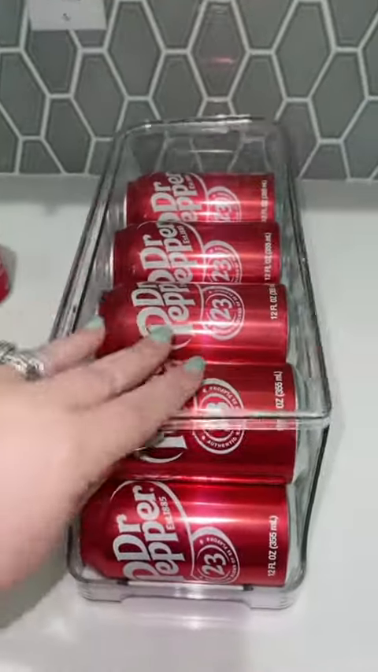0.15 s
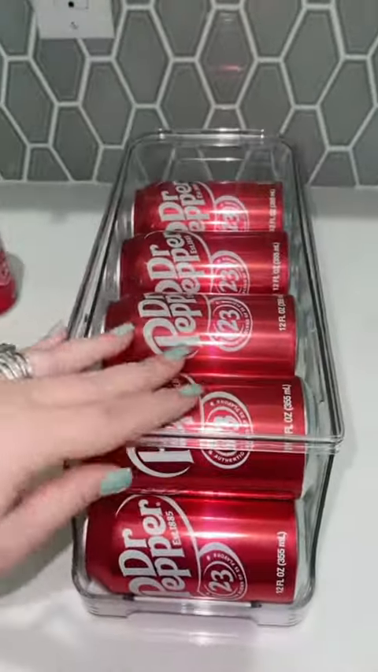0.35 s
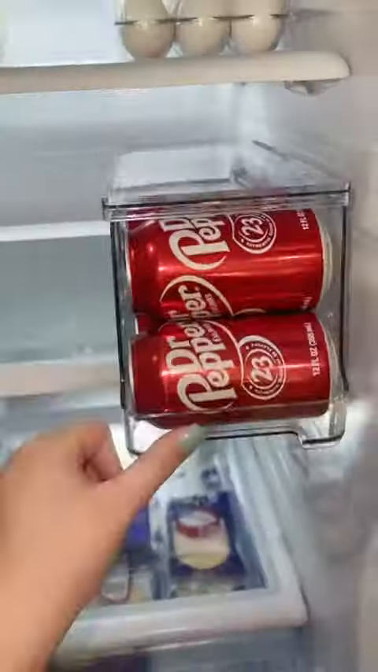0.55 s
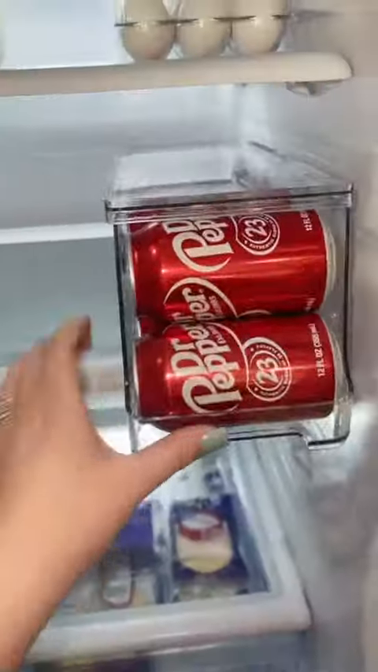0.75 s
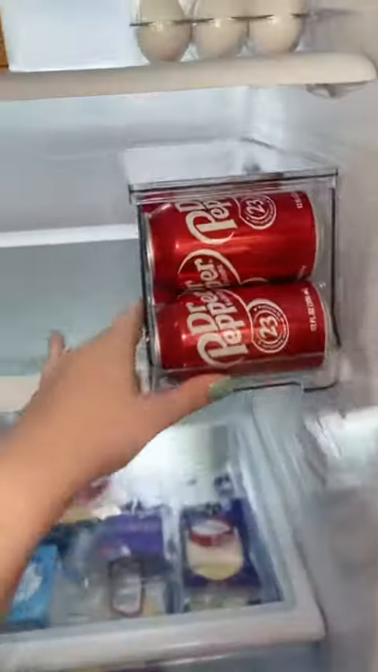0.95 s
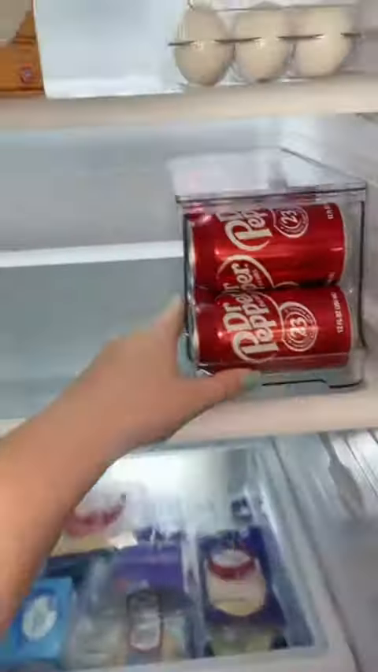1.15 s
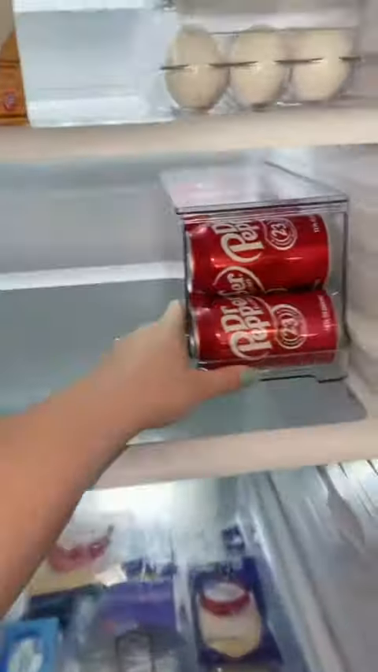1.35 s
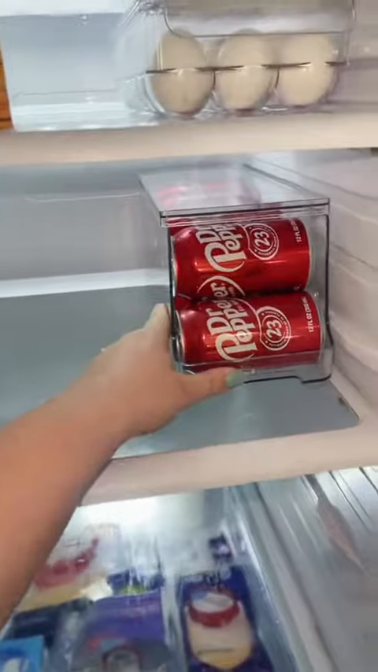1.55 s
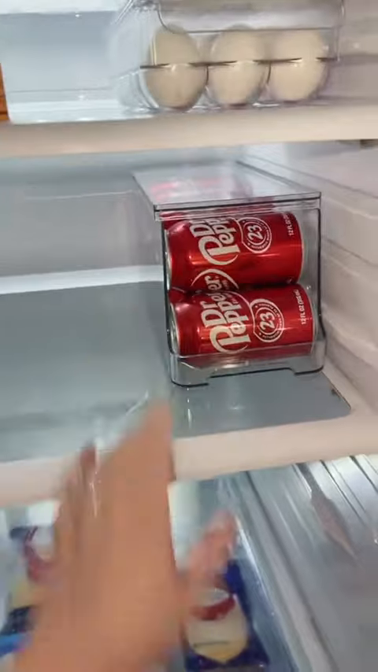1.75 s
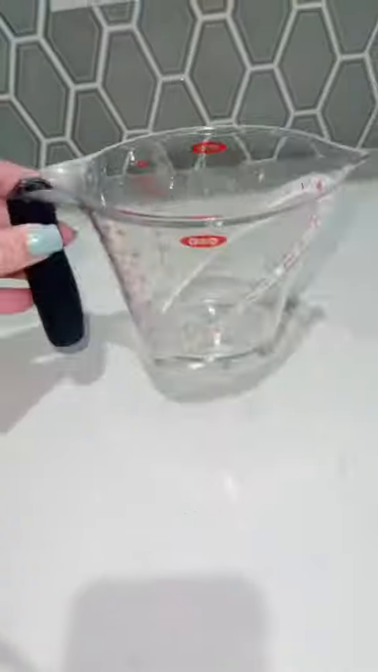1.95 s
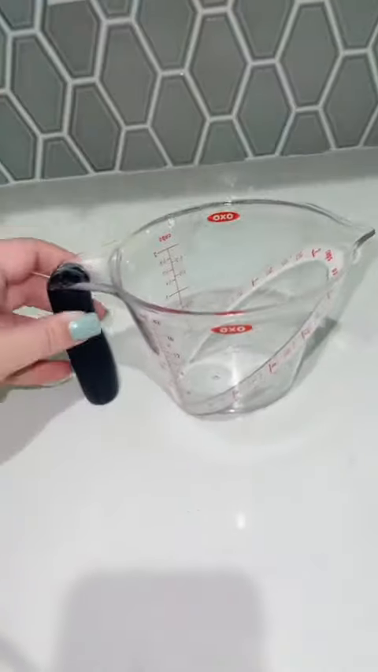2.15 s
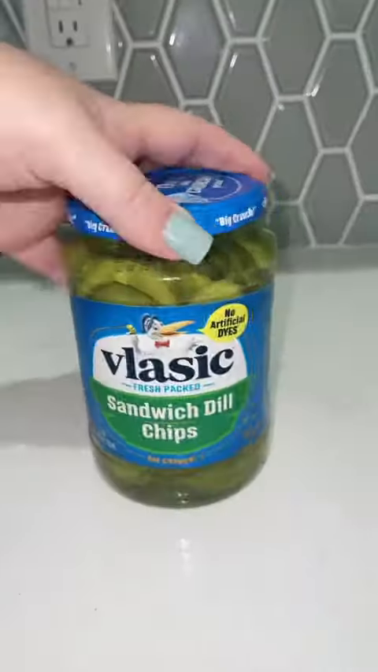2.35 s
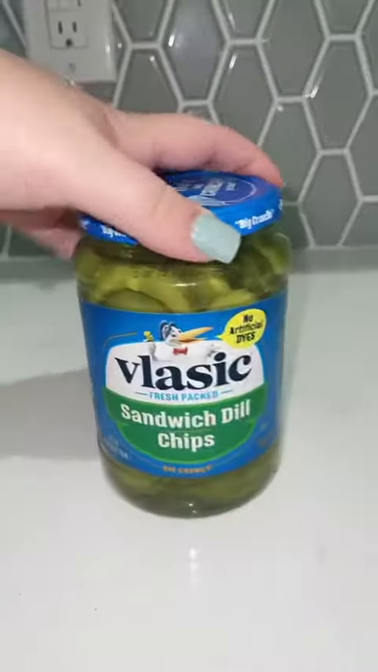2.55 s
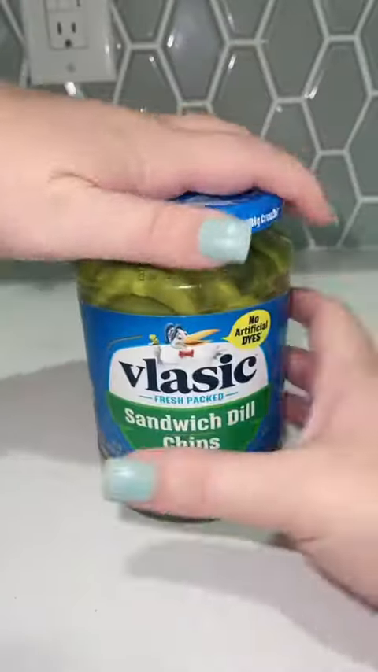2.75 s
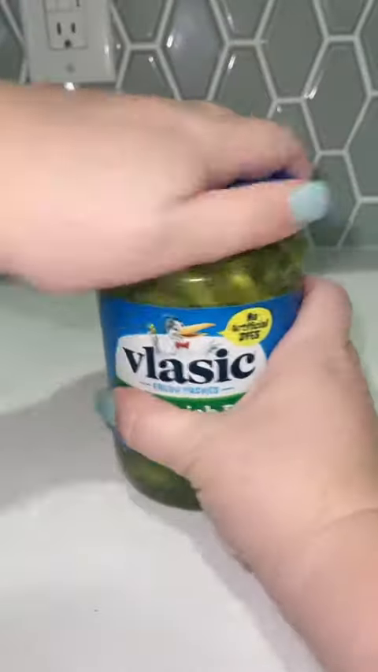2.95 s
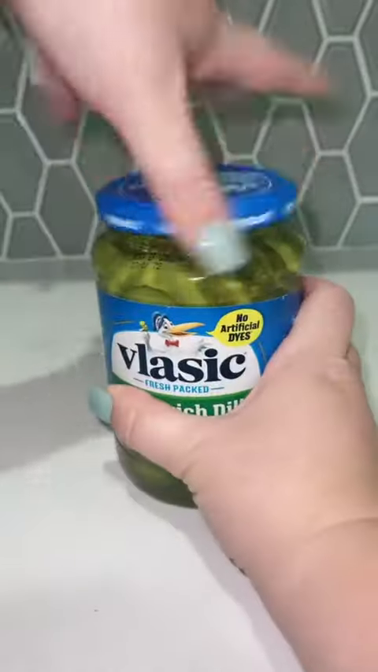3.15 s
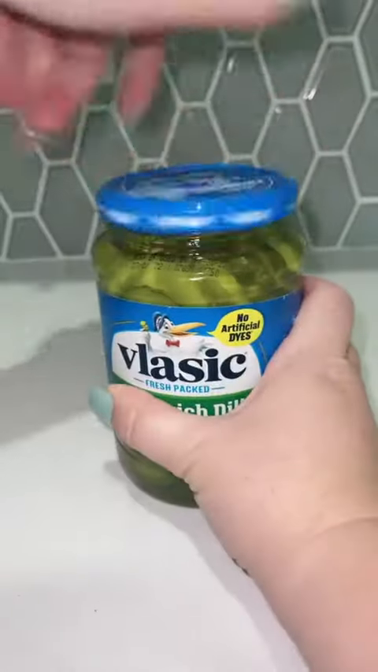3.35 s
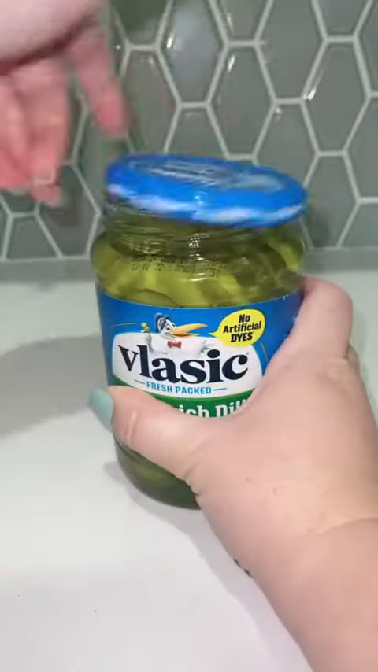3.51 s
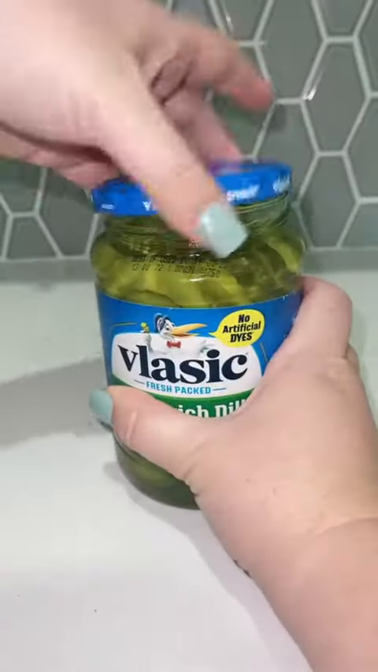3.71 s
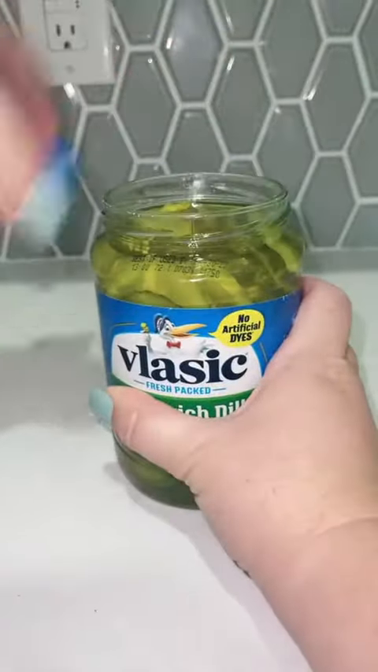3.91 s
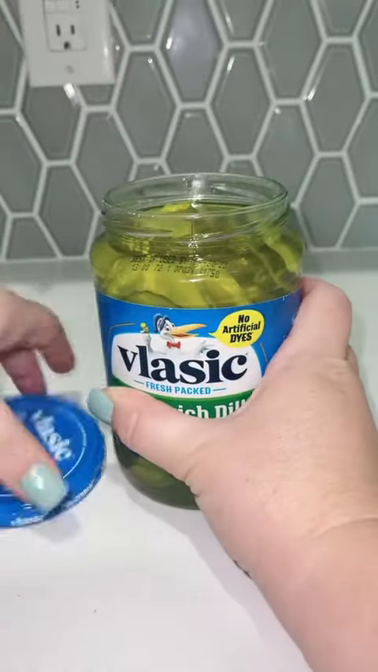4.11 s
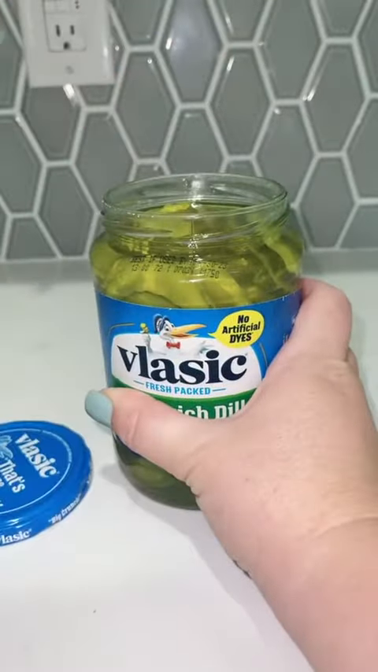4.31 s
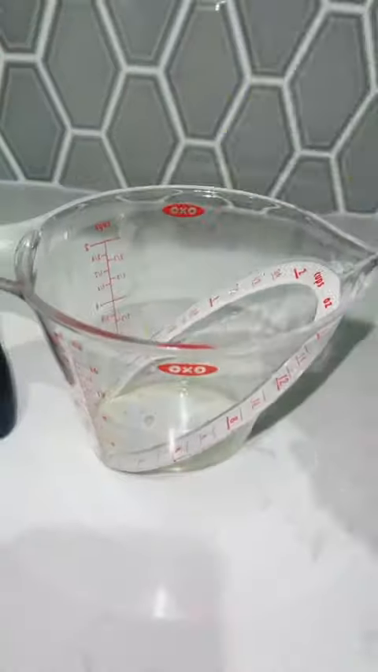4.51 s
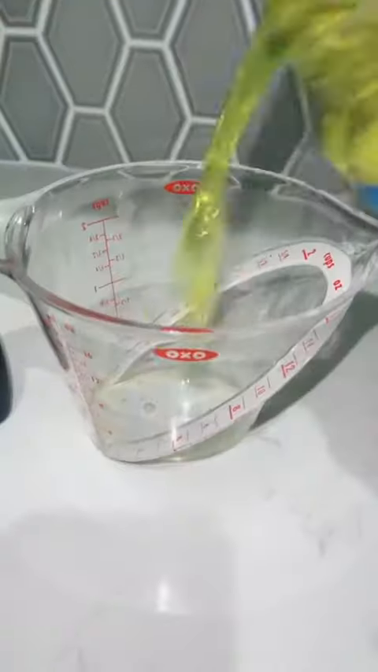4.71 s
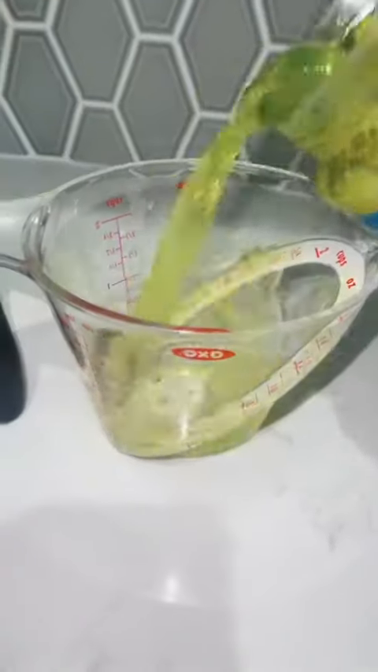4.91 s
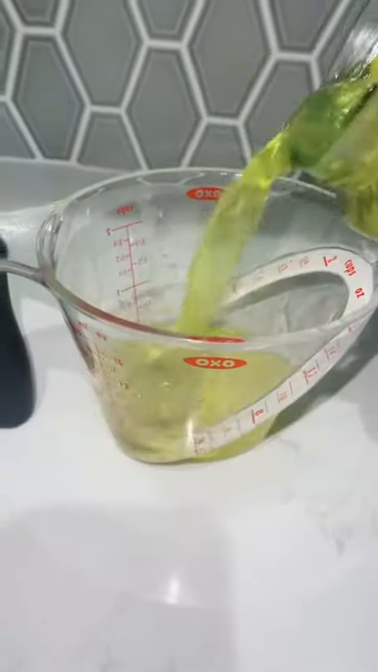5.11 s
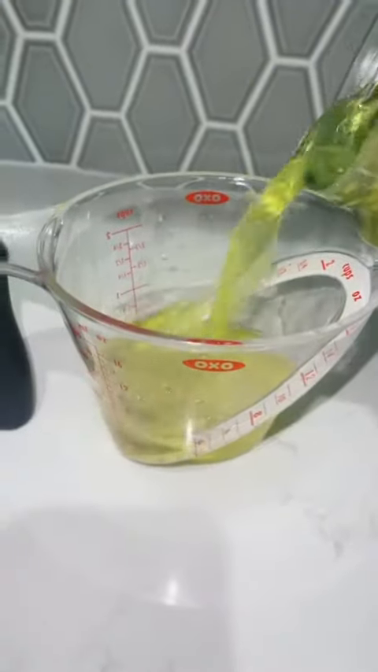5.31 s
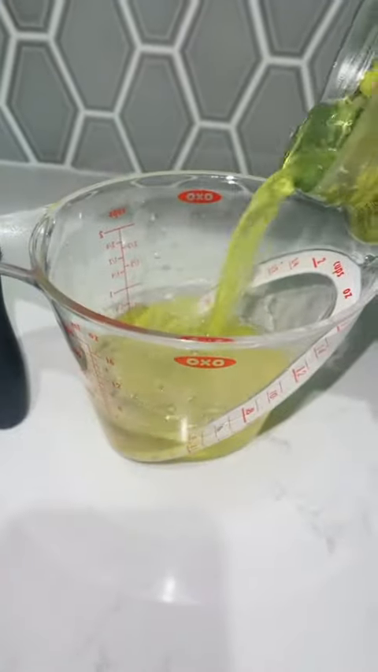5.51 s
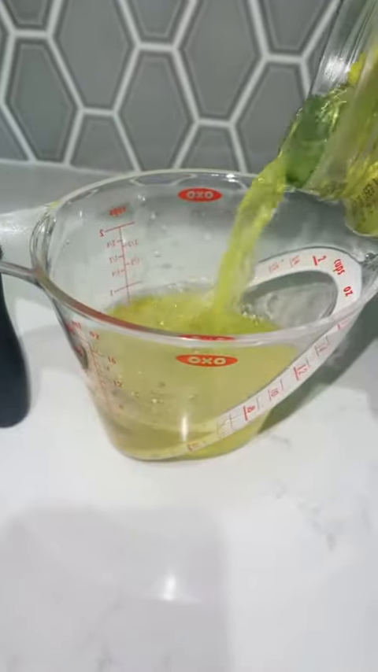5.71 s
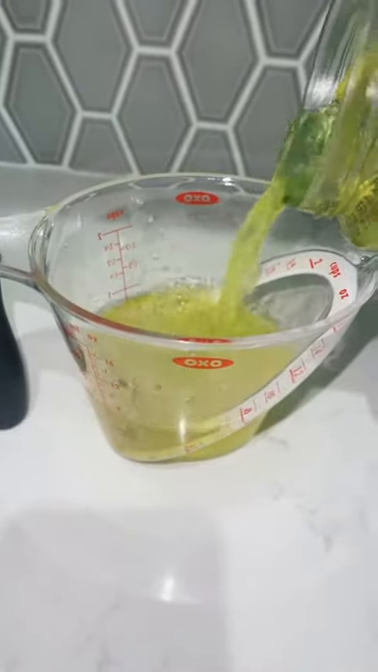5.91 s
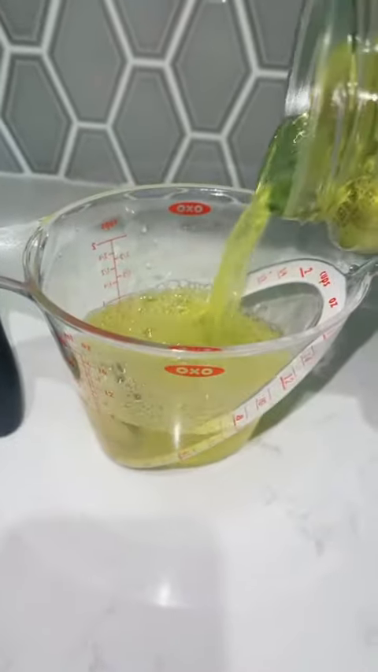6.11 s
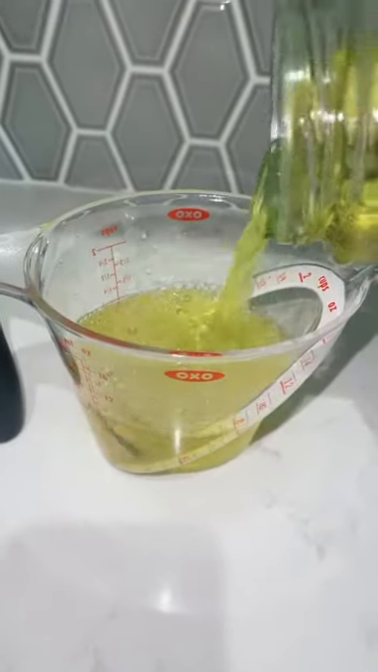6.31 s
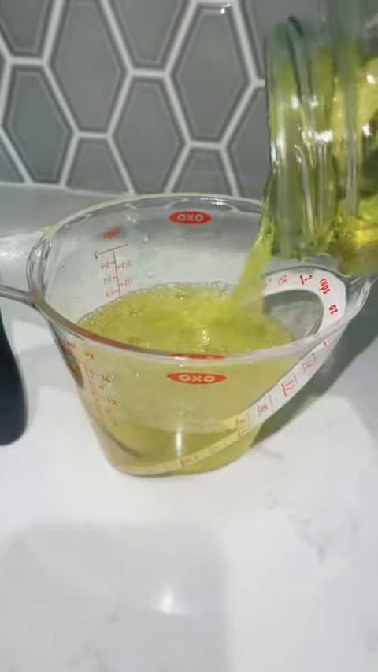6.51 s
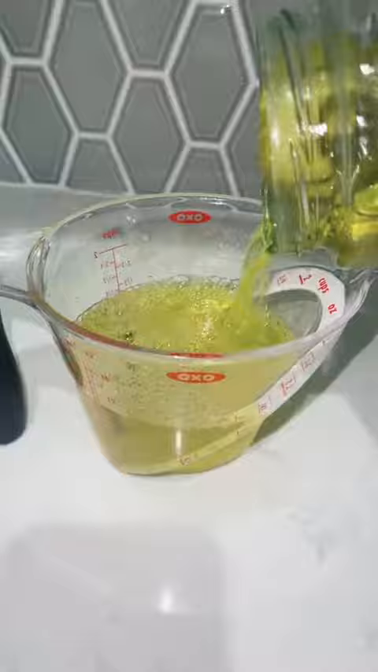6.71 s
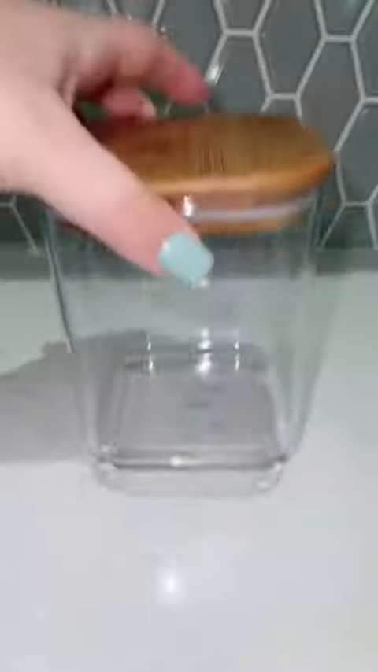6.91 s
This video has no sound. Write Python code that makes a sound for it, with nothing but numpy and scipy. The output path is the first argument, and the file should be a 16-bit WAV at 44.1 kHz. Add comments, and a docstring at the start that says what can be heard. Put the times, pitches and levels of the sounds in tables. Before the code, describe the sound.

Close kitchen handling sounds: hard plastic clacks, shelf thuds, a scraping jar lid rattling on the counter, splashing liquid filling a cup, one final knock.

```python
"""A kitchen with hard walls and a low hum, heard in six short moments with near-silent gaps between them.
A lid clacks onto a plastic bin of cans, the bin is pushed onto a fridge shelf, a plastic measuring cup is set
down, a steel lid is unscrewed from a pickle jar and dropped, brine is poured into the cup, a canister lands.
Solid things are bursts of noise played through the resonances of each object; the brine is made of many small
ringing bubbles and spatter, and the hum is filtered noise."""
import sys
import numpy as np
from scipy import signal
from scipy.fft import rfft, irfft
from scipy.io import wavfile
from scipy.ndimage import uniform_filter1d

SR = 44100
rng = np.random.default_rng(int(sys.argv[2]) if len(sys.argv) > 2 else 0)


def dump(signal):
    """Clip the signal to [-1, 1] and save it as 16-bit WAV at the path in sys.argv[1]."""
    limited = np.clip(np.atleast_2d(signal).T, -1, 1)
    pcm = np.round(limited * 32767).astype(np.int16)
    wavfile.write(sys.argv[1], SR, pcm)


N = 311346
T = np.arange(N) / SR  # time in seconds
SPAN = 32768  # samples in one response or contact
HZ = np.maximum(np.arange(SPAN // 2 + 1) * SR / SPAN, 1)  # frequencies of its spectrum

# when each of the six moments is heard: start_s, end_s [s, s]
MOMENTS = [(-1, .545), (.665, 1.893), (2.0, 2.335), (2.465, 4.523), (4.61, 6.748), (6.86, 7.1)]
# when the pour begins and ends: start_s, end_s [s, s]
POUR_SPAN = (4.7, 6.8)


def undb(db):
    """Turn decibels into a gain."""
    return 10 ** (np.asarray(db) / 20)


def unit(x):
    """Scale to an rms (average strength) of one."""
    return x / np.sqrt(np.mean(x ** 2))


def add(out, x, s):
    """Mix x into out from time s."""
    i = int(s * SR)
    x = x[max(-i, 0):]
    i = max(i, 0)
    out[i:i + len(x)] += x[:max(N - i, 0)]


def colour(points):
    """Filter that follows (Hz, dB) points and never sounds ahead of its input."""
    hz, db = np.transpose(points)
    cepstrum = irfft(np.log(undb(np.interp(np.log(HZ), np.log(hz), db))))
    # folding the second half onto the first makes the filter respond at once (minimum phase)
    cepstrum[1:SPAN // 2] *= 2
    cepstrum[SPAN // 2 + 1:] = 0
    return np.exp(rfft(cepstrum))


def resonances(modes):
    """Filter that rings at each (Hz, width Hz, dB) mode; a narrower mode rings longer."""
    return sum(undb(db) * 1j * HZ * width / (hz ** 2 - HZ ** 2 + 1j * HZ * width) for hz, width, db in modes)


def body(modes, clack, ring_db, dense_db, dense_t60_s):
    """Response of an object: a broad clack, a crowd of small modes that dies together, and a few strong modes."""
    broad = colour(clack)
    crowd = rng.standard_normal(SPAN) * undb(-60 * np.arange(SPAN) / SR / dense_t60_s)
    crowd_spectrum = rfft(crowd) / np.sqrt(np.sum(crowd ** 2))
    crowd_spectrum = crowd_spectrum * HZ / (HZ + 1000)  # modes crowd together towards the treble
    ringing = resonances(modes) * broad / abs(broad)  # takes only the timing of the clack
    return broad * (1 + undb(dense_db) * crowd_spectrum) + undb(ring_db) * ringing


def through(x, response):
    """Play a force through a response."""
    return signal.fftconvolve(x, irfft(response))[:N]


def grit(count, spread_db):
    """Dense micro-contacts of very unequal size."""
    sizes = undb(spread_db * np.minimum(rng.exponential(size=count), 5))
    return unit(rng.standard_normal(count) * sizes)


def contacts(hits, response, graze_db, graze_s, spread_db):
    """Each contact grazes in, lands and chatters out, with its own brightness and uneven colour of its spot."""
    out = np.zeros(N)
    lead = 1 / 20  # seconds kept for the graze before the landing
    t = np.arange(SPAN) / SR - lead
    octaves = np.log2(np.clip(HZ, 700, 8000) / 1000)
    for s, chatter, db, bright in hits:
        graze = undb(graze_db) * np.exp(-abs(t) / graze_s)
        press = np.where(t < 0, graze, np.exp(-abs(t) / max(chatter, 1e-3)))
        spot_db = 2.5 * np.interp(HZ / 300, np.arange(80), rng.standard_normal(80))
        force = rfft(press * grit(SPAN, spread_db))
        sound = irfft(force * response * undb(bright * octaves + spot_db))
        loudest = np.sqrt(uniform_filter1d(sound ** 2, size=353).max())  # strongest 8 ms
        add(out, sound * undb(db) / loudest, s - lead)
    return out


def strokes(rows, attack_s, release_s):
    """Gain over time of (start s, length s, dB) movements: attack, hold, release."""
    return sum(undb(db) * np.clip((T - s) / attack_s, 0, 1) * np.exp(-np.maximum(T - s - length, 0) / release_s)
               for s, length, db in rows)


def surge(rate, depth_db):
    """A gain that wanders at random, with a new target `rate` times a second."""
    steps = rng.standard_normal(512)
    return undb(depth_db * np.interp(T * rate, np.arange(512), steps))


def hum():
    """A low hum made of noise, faint at the start of each later moment; the fridge drones in the first two."""
    # steady level of the hum in each moment: level_db [dB]
    moment_levels = [-54, -54, -58.5, -54, -54.5, -53.5]
    # tone colour of the hum: pitch_hz, relative_db [Hz, dB]
    hum_colour = [(25,-10), (60,-6.5), (125,4.5), (180,-10.5), (235,-5), (400,-12.5), (1500,-19.5),
                  (4000,-26.5), (15000,-51.5)]
    dip_db, recovery_s = 24, .2
    fridge_hz, fridge_width_hz, fridge_db = 230, 50, -64.5
    level_db = np.zeros(N)
    for (start, _), db in zip(MOMENTS, moment_levels):
        dipped_db = db - dip_db * np.exp(-abs(T - start) / recovery_s)
        level_db = np.where(T > start - .01, dipped_db, level_db)
    room = unit(through(rng.standard_normal(N), colour(hum_colour))) * undb(level_db)
    fridge = resonances([(fridge_hz, fridge_width_hz, 0)]) ** 2
    drone = unit(through(rng.standard_normal(N), fridge))
    return room + drone * undb(fridge_db) * (T < MOMENTS[1][1])


def kitchen(x, wet_db, t60_s, treble_t60_s):
    """Diffuse echo from tiles and cupboards; the treble dies first."""
    t = np.arange(SPAN) / SR
    noise = rng.standard_normal(SPAN)
    low = irfft(rfft(noise) / (1 + (HZ / 5000) ** 4))
    treble = noise - low
    tail = low * undb(-60 * t / t60_s) + treble * undb(-60 * t / treble_t60_s)
    tail = tail * (t > .004)  # the first echo arrives after 4 ms
    return x + undb(wet_db) * through(x, rfft(tail) / np.sqrt(np.sum(tail ** 2)))


def canister():
    """A wood-lidded canister knocks once on the counter and its shell rings briefly."""
    # the landing: start_s, chatter_s, level_db, brightness [s, s, dB, dB per octave]
    landing = [(7.011, 0.003, -23.5, -1.5)]
    # ringing of the shell: pitch_hz, width_hz, relative_db [Hz, Hz, dB]
    modes = [(253,60,-10), (635,42,-9), (770,71,9.5), (1320,104,-7), (1910,14,-12), (3430,77,-7)]
    # broad colour of the knock: pitch_hz, relative_db [Hz, dB]
    clack = [(80,-20), (240,-3.5), (450,-10.5), (780,4.5), (900,-14), (1400,-12.5), (3500,-24), (16000,-40)]
    shell = body(modes, clack, ring_db=-5, dense_db=2.0, dense_t60_s=0.064)
    return contacts(landing, shell, graze_db=-6, graze_s=0.0052, spread_db=5.5)


def measuring_cup():
    """The empty cup lands on two edges and rings on as it is dragged a little."""
    # the two edges landing: start_s, chatter_s, level_db, brightness [s, s, dB, dB per octave]
    edges = [(2.127,0.01,-30.5,-4), (2.146,0.0068,-27.5,-7.5)]
    # the drag on the counter: start_s, length_s, level_db [s, s, dB]
    drag_rows = [(2.16, 0.15, -51)]
    # ringing of the cup: pitch_hz, width_hz, relative_db [Hz, Hz, dB]
    modes = [(356,19,-23.5), (740,15,1), (943,18,-12), (1034,15,-10), (1178,16,-9), (2000,46,-24)]
    # broad colour of the contact: pitch_hz, relative_db [Hz, dB]
    clack = [(150,-44.5), (420,-29), (730,-10.5), (1050,-6), (1600,-22), (3200,-22), (7000,-58),
             (16000,-72)]
    cup = body(modes, clack, ring_db=9.0, dense_db=-4, dense_t60_s=.04)
    landing = contacts(edges, cup, graze_db=0.0, graze_s=0.0055, spread_db=1)
    drag_colour = colour([(500, 0.5), (1000, 4.5), (3000, -9.5)])
    drag = unit(through(grit(N, spread_db=-1.5), cup * drag_colour))
    return landing + drag * strokes(drag_rows, attack_s=.04, release_s=0.018)


def plastic_bin():
    """The lid clacks shut; the loaded bin bumps, rumbles and hisses along the fridge shelf."""
    # the lid is pressed and snaps shut: start_s, chatter_s, level_db, brightness [s, s, dB, dB per octave]
    lid_hits = [(0.006, 0.017, -33, -2), (0.068, 0.027, -25.5, -6), (0.095, 0.0091, -15, -6),
                (0.152, 0.02, -23, -6.5), (0.168, 0.0066, -15, -0.5), (0.229, 0.012, -24, -5),
                (0.267, 0.0087, -14, 0.5), (0.392, 0.018, -40.5, -4)]
    # the bin bumps on the shelf: start_s, level_db, brightness [s, dB, dB per octave]
    shelf_hits = [(1.056, -26.5, -1), (1.136, -39.5, 3), (1.175, -18, 0.5), (1.21, -21, -1.5),
                  (1.262, -31.5, -1.5), (1.311, -14, -1), (1.36, -23.5, 1), (1.444, -40, 2.5),
                  (1.592, -51, 3)]
    # plastic and skin slide in the fridge: start_s, length_s, level_db [s, s, dB]
    slides = [(.81, 0.55, -65.5), (1.32, 0.061, -41.5), (1.65, 0.1, -48), (1.78, 0.11, -67)]
    # ringing of the bin, then of the shelf: pitch_hz, width_hz, relative_db [Hz, Hz, dB]
    lid_modes = [(251.2, 39, -13.5), (572, 24, -4.5), (726, 160, -5.5), (890, 65, -8), (1018, 50, -3),
                 (1356, 160, -6.5), (1905, 35, -9.5), (5850, 150, -14)]
    shelf_modes = [(127.7, 16, -8), (549.5, 32, 0.5), (734, 70, -24.5), (918, 23, -13.5)]
    # broad colour of the lid, of the shelf and of the sliding: pitch_hz, relative_db [Hz, dB]
    lid_clack = [(60,-22.5), (250,-9.5), (340,-10.5), (770,-1), (1600,-17.5), (3600,-13), (6000,-22),
                 (7200,-29.5), (16000,-41.5)]
    shelf_clack = [(30,-26), (60,-9.5), (127,-13), (230,-7), (460,-8), (740,-6), (1590,-19), (3400,-23.5),
                   (16000,-55)]
    rub_colour = [(200, -6.5), (1000, -8.5), (2500, -4.5), (4000, 0.5), (8000, -3.5), (15000, -9.5)]
    bump_chatter_s = 0.017
    # the shelf rumbles most as the bin is pushed home
    push_s, rumble_db, rise_db_per_s, fall_db_per_s = 1.34, -31, 68.5, 74

    lid = body(lid_modes, lid_clack, ring_db=-1.5, dense_db=-9, dense_t60_s=0.04)
    clacks = contacts(lid_hits, lid, graze_db=-6.5, graze_s=0.0045, spread_db=5)

    shelf = body(shelf_modes, shelf_clack, ring_db=2.5, dense_db=-5, dense_t60_s=0.038)
    knocks = [(s, bump_chatter_s, db, bright) for s, db, bright in shelf_hits]
    bumps = contacts(knocks, shelf, graze_db=-3.5, graze_s=0.0046, spread_db=2.5)

    rumble_colour = colour([(30, -18.5), (85, 1.5), (135, -2.0), (200, -10.5), (400, -22.5), (1500, -53)])
    rumble = unit(through(rng.standard_normal(N), rumble_colour))
    push_db = rumble_db - np.maximum(rise_db_per_s * (push_s - T), fall_db_per_s * (T - push_s))
    on_shelf = T > shelf_hits[0][0]

    hiss = unit(through(rng.standard_normal(N), colour(rub_colour)))
    sliding = hiss * strokes(slides, attack_s=0.051, release_s=0.024)
    return clacks + bumps + rumble * undb(push_db) * on_shelf + sliding


def rocking(count):
    """The lid rocks from side to side on its rim, each touch sooner, weaker and duller than the last."""
    start_s, first_gap_s, gap_ratio, chatter_s = 4.147, .028, .93, .013
    first_db, loss_db = -22, 2  # loss per touch
    first_bright, dulling = 2.9, 1.3  # dB per octave, and its loss per touch
    light_side_db = -1.5  # every second touch falls on the lighter side
    k = np.arange(count)
    gaps = first_gap_s * gap_ratio ** k
    times = start_s + np.cumsum(gaps) - gaps
    levels = first_db - loss_db * k + light_side_db * (k % 2)
    return [(s, chatter_s, db, first_bright - dulling * i) for i, s, db in zip(k, times, levels)]


def pickle_jar():
    """The lid scrapes over the glass thread, damped by the hand; on the counter it rings freely."""
    # the lid catches on the thread: start_s, chatter_s, level_db [s, s, dB]
    thread_hits = [(2.607, 0.0027, -46), (2.699, 0.01, -38.5), (2.92, 0.083, -46), (3.004, 0.013, -27),
                   (3.017, 0.003, -26.5), (3.103, 0.024, -17), (3.179, 0.029, -29.5), (3.266, 0.044, -29.5),
                   (3.307, 0.017, -17), (3.336, 0.017, -16.5), (3.373, 0.023, -16.5), (3.473, 0.008, -28),
                   (3.499, 0.013, -16.5), (3.532, 0.021, -15.5), (3.616, 0.0097, -28),
                   (3.654, 0.013, -32.5), (3.73, 0.016, -37)]
    # the loose lid meets the counter: start_s, chatter_s, level_db, brightness [s, s, dB, dB per octave]
    counter_hits = [(4.098, 0.0099, -34, 5), (4.11, 0.0057, -22.5, 2), (4.118, 0.0045, -13.5, 1.5),
                    (4.262, 0.066, -41, -2)]
    # the lid rubs round the thread: start_s, length_s, level_db [s, s, dB]
    twist = [(3.01, 0.574, -44)]
    # ringing of the held lid on the jar, then of the free lid: pitch_hz, width_hz, relative_db [Hz, Hz, dB]
    held_modes = [(590,44,-6.5), (705,24,-7), (905,22,-2.5), (1078,40,-1), (1182,40,-1), (1624,55,-1.5),
                  (2312,43,4), (2514,32,-0.5), (3244,170,-4.5), (3756,67,-7), (4047,50,-4), (4500,28,-6.5),
                  (6380,37,-4.5), (6900,20,-15.5)]
    free_modes = [(583,50,-12), (895,8.9,-4.5), (1487,35,-3.5), (1566,30,-5), (2320,20,9.5),
                  (2550,5.9,-10.5), (2850,9,-11), (3750,9,-14), (4022,18,3.5), (4460,5.4,-8.5),
                  (6510,22,-9.5), (8441,5.5,-13)]
    # broad colour of each, held then free: pitch_hz, relative_db [Hz, dB]
    held_clack = [(80,-26), (240,-15), (400,-4), (1200,-6.5), (1950,-10), (2400,-4), (2750,-12), (4300,-17),
                  (5050,-15.5), (6500,-12.5), (8000,-14.5), (15000,-14)]
    free_clack = [(150,-27.5), (1000,-9), (1600,-1.5), (3300,-12.5), (4400,-6), (5100,-24), (6000,-16),
                  (11000,-18), (15000,-15)]
    # a harder catch is brighter: dB per octave for each dB over the neutral level
    neutral_db, bright_per_db = -21, 0.21

    held = body(held_modes, held_clack, ring_db=4.5, dense_db=-0.5, dense_t60_s=0.045)
    catches = [(s, chatter, db, bright_per_db * (db - neutral_db)) for s, chatter, db in thread_hits]
    thread = contacts(catches, held, graze_db=-5, graze_s=0.0048, spread_db=4)
    rub_colour = colour([(1500, -3), (6000, -13.5)])
    rubbing = unit(through(grit(N, spread_db=4), held * rub_colour))
    twisting = rubbing * strokes(twist, attack_s=0.017, release_s=0.023)

    free = body(free_modes, free_clack, ring_db=8.0, dense_db=-6.5, dense_t60_s=0.14)
    touches = list(counter_hits) + rocking(count=5)
    clatter = contacts(touches, free, graze_db=-3.5, graze_s=0.0024, spread_db=1.5)
    return thread + clatter + twisting


def bubbles(count, low_hz, high_hz, cycles, glide, spread_db):
    """Trapped air rings for a few cycles and rises in pitch as it nears the surface."""
    out = np.zeros(N)
    start, end = POUR_SPAN
    for when, pitch, life, size in rng.random((count, 4)):
        hz = low_hz * (high_hz / low_hz) ** pitch
        decay = cycles * (.5 + life) / hz
        age = np.arange(int(5 * decay * SR)) / (SR * decay)  # counted in decay times
        ring = np.sin(2 * np.pi * hz * decay * age * (1 + glide * age)) * np.exp(-age)
        add(out, ring * undb(spread_db * size) * np.sqrt(hz), start + when * (end - start))
    return out


def pour():
    """Bubbles and spatter sound in the cup: first they drum on its bare floor, then the filling cup gurgles."""
    # brine dribbles, then streams: start_s, length_s, level_db before the pool and surges [s, s, dB]
    stream_rows = [(4.745, 0.136, -69.5), (4.875, 1.9, -51)]
    # the loudest splashes: start_s, level_db, brightness [s, dB, dB per octave]
    splash_hits = [(4.817, -49.5, 9), (4.883, -41, -1), (4.956, -41, -2), (4.991, -38.5, -8.5),
                   (5.03, -36.5, -5), (5.28, -44, 2.5), (5.349, -40, -16), (5.394, -42, -5),
                   (5.479, -39, -0.5), (5.87, -35, 26), (6.012, -37.5, -4), (6.088, -41.5, 7),
                   (6.232, -45, 3), (6.288, -39, 5), (6.391, -47, 17), (6.455, -44, 5)]
    # ringing of the cup under the pour: pitch_hz, width_hz, relative_db [Hz, Hz, dB]
    modes = [(898,116,-1.5), (1400,93,5.5), (2310,260,-2.5), (4340,200,-10.5), (5600,430,-16)]
    # broad colour of the pour: pitch_hz, relative_db [Hz, dB]
    pour_colour = [(200,-19), (480,-18.5), (660,-20), (950,-9), (2400,-3.5), (3900,-10), (7500,-10),
                   (11000,-16.5), (15000,-14)]
    # once the pool is deep enough to trap air, the pour grows louder
    pool_s, pool_rise_s, pool_gain_db = 5.14, 0.34, 2
    plop_db, spatter_db = -9, -2.5  # relative to the froth
    splash_decay_s = 0.0052
    gurgle_db, gurgle_fade_db_per_s = -52, 4.5
    thrum_hz, thrum_width_hz, thrum_db = 121, 64, -56.5  # the stream thrums low on the filled cup
    # the cup's wall rings less and less until the brine covers it
    wall_hz, wall_width_hz, wall_db, wall_covered_s = 4520, 700, 1.5, 6.3

    cup = body(modes, pour_colour, ring_db=-0.5, dense_db=-1, dense_t60_s=0.062)
    pour_start, pour_end = POUR_SPAN
    pouring = (T > pour_start) & (T < pour_end)
    pool = np.clip((T - pool_s) / pool_rise_s, 0, 1)

    froth = through(bubbles(count=3600, low_hz=400, high_hz=6500, cycles=5, glide=.004, spread_db=22), cup)
    plops = bubbles(count=70, low_hz=400, high_hz=2800, cycles=7, glide=.005, spread_db=14)
    spatter = unit(through(grit(N, spread_db=4.5), cup))
    stream = froth / froth[pouring].std()
    stream = stream + undb(plop_db) * plops / plops[pouring].std()
    stream = stream + undb(spatter_db) * spatter

    flow = strokes(stream_rows, attack_s=0.0097, release_s=0.0058)
    flow = flow * undb(pool_gain_db * pool) * surge(rate=35, depth_db=2.5)
    splashes = [(s, splash_decay_s, db, bright) for s, db, bright in splash_hits]
    liquid = stream * flow + contacts(splashes, cup, graze_db=-6, graze_s=0.003, spread_db=3.5)

    bare = np.clip((5.2 - T) / 0.52, 0, 1)  # brine covers the floor of the cup and damps it
    drumming = through(liquid * bare, resonances([(752, 45, 13.4)]))
    uncovered = np.clip((wall_covered_s - T) / (wall_covered_s - pour_start), 0, 1)
    wall = through(liquid * uncovered, resonances([(wall_hz, wall_width_hz, wall_db)]))

    gurgle_colour = colour([(230, -24), (310, -10.0), (338, 1.5), (375, -11.5), (520, -27), (2000, -56.5)])
    gurgle = unit(through(grit(N, spread_db=10.5), gurgle_colour))
    fading_db = gurgle_db - gurgle_fade_db_per_s * (T - pool_s)
    thrum = unit(through(rng.standard_normal(N), resonances([(thrum_hz, thrum_width_hz, 0)]) ** 2))
    deep = gurgle * undb(fading_db) + thrum * undb(thrum_db)
    return liquid + drumming + wall + deep * pool * pouring


def scene():
    """All the handling in the room, over the low hum of the kitchen."""
    handling = plastic_bin() + measuring_cup() + pickle_jar() + pour() + canister()
    in_room = kitchen(handling, wet_db=-18, t60_s=0.41, treble_t60_s=0.19)
    return (in_room + hum())[None]


def record(dry):
    """Near silence between the moments; the loudest peaks are rounded and the top is cut steeply."""
    top_hz, gap_db, ceiling = 15950, -41.5, .65
    live = sum((T > start) & (T < end) for start, end in MOMENTS)
    gate = uniform_filter1d(live * 1., size=130) + undb(gap_db)  # edges last about 3 ms
    rounded = ceiling * np.tanh(dry * gate / ceiling)
    return signal.sosfilt(signal.ellip(12, .2, 80, top_hz, fs=SR, output="sos"), rounded)


dry = scene()
out = record(dry)
dump(out)
```